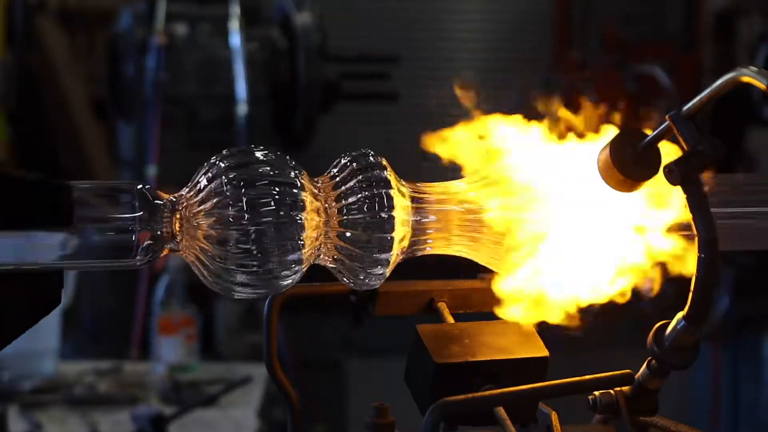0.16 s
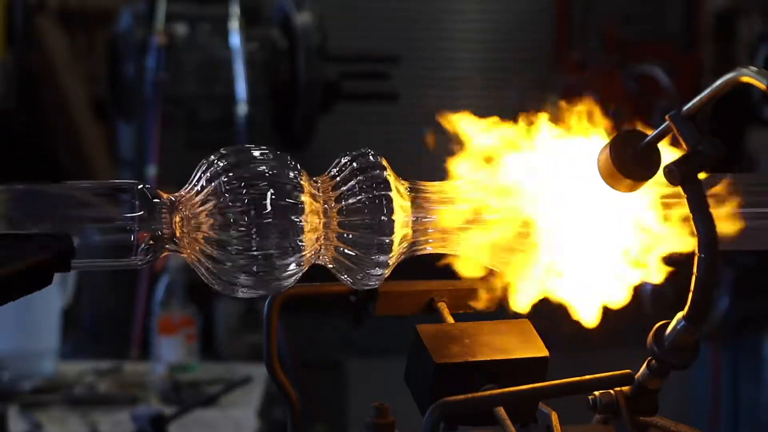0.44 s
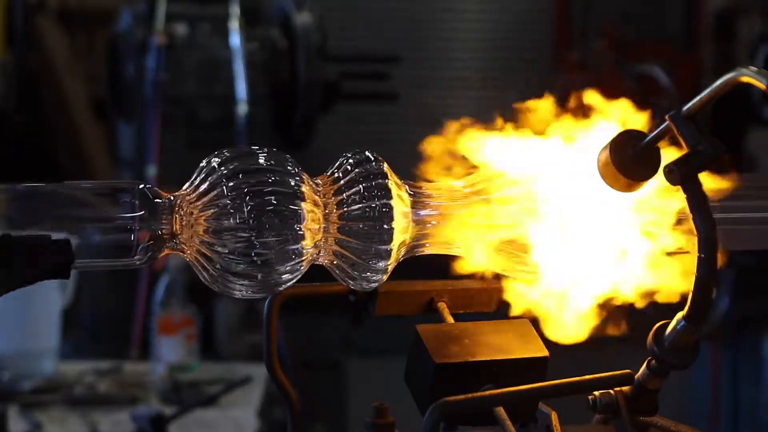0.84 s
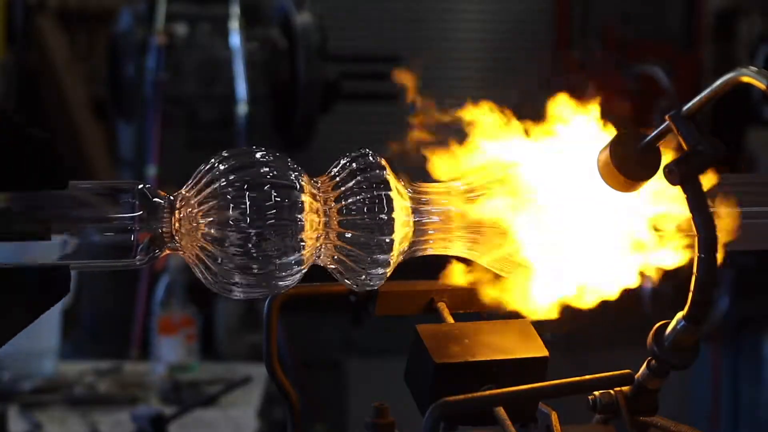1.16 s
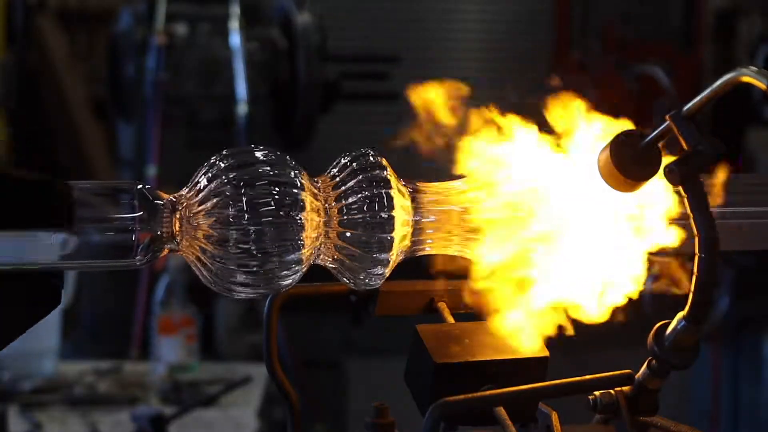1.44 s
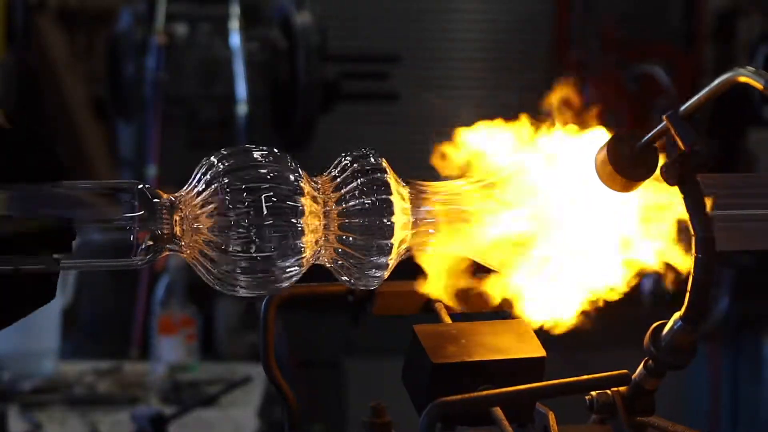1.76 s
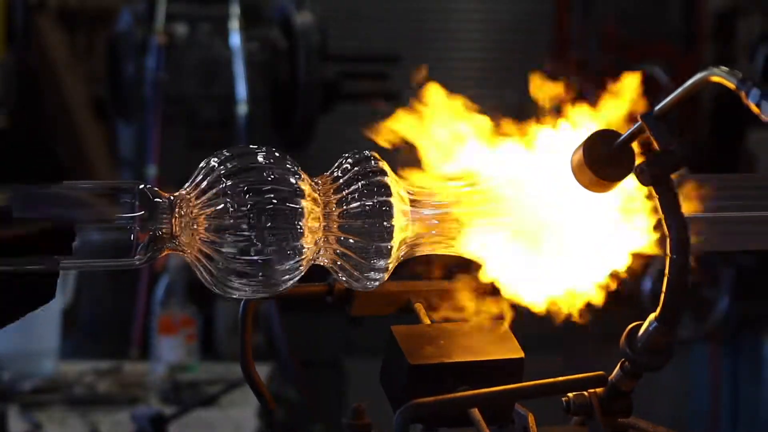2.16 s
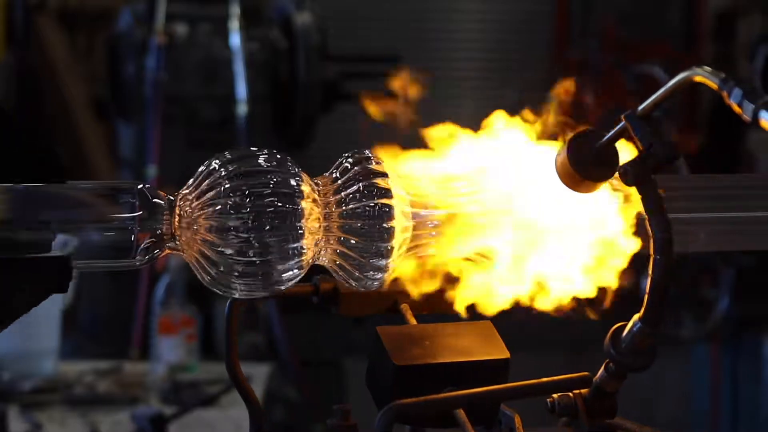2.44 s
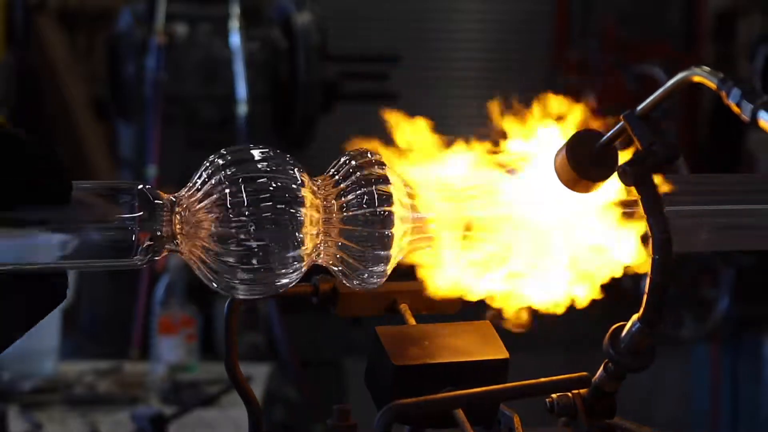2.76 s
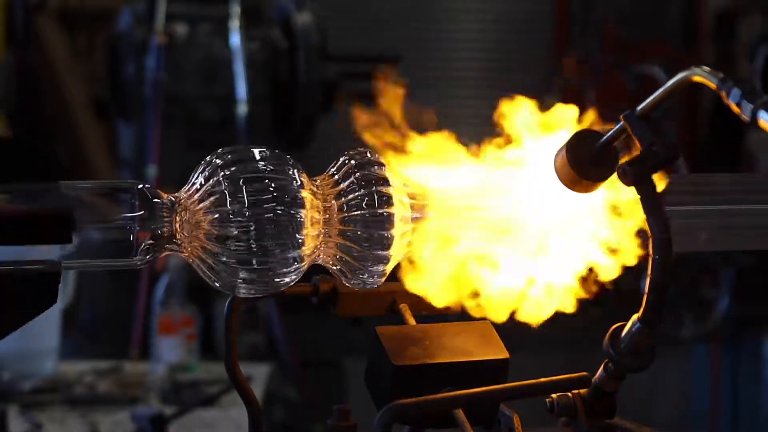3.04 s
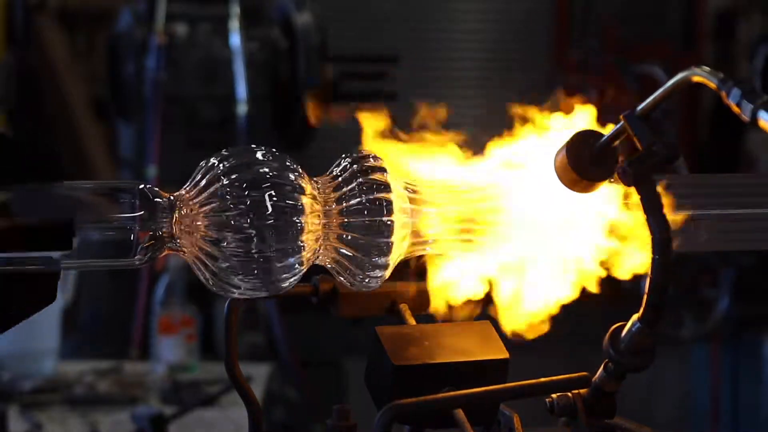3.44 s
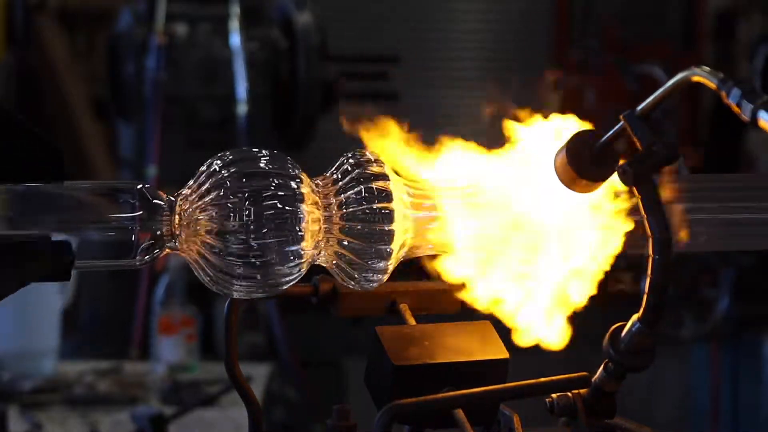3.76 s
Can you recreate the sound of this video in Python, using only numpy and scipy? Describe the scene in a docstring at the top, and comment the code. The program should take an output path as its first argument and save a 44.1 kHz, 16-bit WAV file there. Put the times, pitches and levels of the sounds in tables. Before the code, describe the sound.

Steady roar of a torch flame heating glass, dominated by airy gas hiss above a low turbulent rumble, with a piercing nozzle whine rapidly swelling and fading throughout; mono, small dry workshop.

```python
"""A gas torch plays on glass turning in a lathe, heard by a single microphone in a workshop.
The flame rumbles low: coloured noise whose bands swell apart and flicker together.
The gas jet hisses as brighter noise with broad humps that sink as the torch swings along the glass.
The nozzle whistles a thin sine, wavering in pitch and level, within a narrow band of airy noise.
The walls give flame and jet a fixed grainy colour through a dense, dying tail of echoes."""
import sys
import numpy as np
from scipy import signal
from scipy.fft import rfft, irfft
from scipy.io import wavfile
from scipy.ndimage import uniform_filter1d

SR = 44100
rng = np.random.default_rng(int(sys.argv[2]) if len(sys.argv) > 2 else 0)


def gain_from_db(level_db):
    """Convert decibel levels to linear amplitude factors (20 dB per decade)."""
    decades = np.asarray(level_db, float) / 20
    return 10 ** decades


def materialize(psi):
    """Save the field psi as 16-bit PCM at rate SR to the path in sys.argv[1].

    A 1-D psi becomes a single channel; in a 2-D psi each row is a channel.
    """
    bounded = np.clip(np.atleast_2d(psi).T, -1, 1)
    quanta = np.round(bounded * 32767).astype(np.int16)
    wavfile.write(sys.argv[1], SR, quanta)


N = 171549  # samples, 3.89 s
BIN_HZ = np.arange(N // 2 + 1) * SR / N
TOP_HZ = 15690  # top of the recorded band


def curve(table, col=1):
    """One column of a time table, joined by straight lines."""
    rows = np.array(table)
    return np.interp(np.arange(N) / SR, rows[:, 0], rows[:, col])


def unit(x):
    """Scale to rms 1."""
    return x / np.sqrt(np.mean(x ** 2))


def walk(rate):
    """Smooth chance that changes about rate times a second; spread 1."""
    window = int(SR / rate)
    smooth = uniform_filter1d(rng.standard_normal(N), window)
    return unit(uniform_filter1d(smooth, window))


def noise(gain):
    """Noise of rms 1 with the gain that a function gives to each frequency."""
    hz = np.maximum(BIN_HZ, 1)
    return unit(irfft(rfft(rng.standard_normal(N)) * gain(hz), N))


def coloured(points):
    """Turbulence: noise of (Hz, dB) colour whose half-octave bands swell alone and flicker together."""
    swell_db, swells_per_s = 0.55, 3
    flicker_db, flickers_per_s = 0.5, 13
    hz, db = np.array(points).T
    f = np.maximum(BIN_HZ, 1)
    colour = gain_from_db(np.interp(np.log(f), np.log(hz), db, right=-90))
    spectrum = rfft(rng.standard_normal(N)) * colour
    first = int(2 * np.log2(hz[0]))
    last = int(2 * np.log2(min(hz[-1], TOP_HZ))) + 1
    total = np.zeros(N)
    for k in range(first, last + 1):
        # overlapping triangles, half an octave apart, that add up to 1
        triangle = np.clip(1 - abs(2 * np.log2(f) - k), 0, 1)
        total += irfft(spectrum * triangle, N) * gain_from_db(swell_db * walk(swells_per_s))
    return unit(total) * gain_from_db(flicker_db * walk(flickers_per_s))


def resonance(hz, width_hz):
    """Noise in one resonance with broad, slowly falling skirts; the width is taken at half amplitude."""
    return noise(lambda f: 1 / (1 + (2 * (f - hz) / width_hz) ** 2))


def flame():
    """Low turbulent burning: a steady rumble of coloured noise."""
    # colour of the burning, relative level per Hz: f/Hz, level/dB
    flame_colour = [(15, -58), (25, -33), (102, -9), (130, -5.5), (181, -1.5), (284, -3), (381, 1.5),
                    (672, -5.5), (850, -5), (1010, -2.5), (1440, -7), (1560, -3.5), (1750, -5.5),
                    (2310, -2.5), (2700, -10.5), (3510, -26), (5940, -120)]
    return gain_from_db(-30.5) * coloured(flame_colour)  # dB


def jet():
    """Gas rushing out: turbulent hiss, with resonant humps that rise and sink over it."""
    # colour of the hiss, relative level per Hz: f/Hz, level/dB
    jet_colour = [(2400, -32), (2750, -12.5), (3250, -5), (3520, -9.5), (3950, -4), (4500, -5),
                  (5100, -3.5), (5900, -1.5), (7500, -2.5), (8800, -1), (9300, -4), (10200, -7),
                  (11300, -6.5), (12200, -2.5), (13100, -9), (14100, -6), (15750, -14.5)]
    # course of the hiss ahead of the lift below: t/s, level/dB
    jet_course = [(0.0, -28), (0.01, -26), (0.53, -26.5), (2.99, -27), (3.02, -27), (3.89, -26)]
    # humps of the hiss: f/Hz, width/Hz
    humps = [(5950, 780), (8800, 1140), (12400, 1300)]
    # course of the humps: t/s, low hump level/dB, middle hump level/dB, high hump level/dB
    hump_course = [(0, -35, -36, -40), (.6, -29, -29, -32), (1.4, -31, -30.5, -35), (1.8, -32, -29, -35),
                   (2.3, -31.5, -32, -38), (2.8, -38, -35, -42), (3.89, -35, -38, -41)]
    lift_db = 6.5
    hiss = gain_from_db(curve(jet_course) + lift_db) * coloured(jet_colour)
    for k, (hz, width_hz) in enumerate(humps):
        hiss += gain_from_db(curve(hump_course, col=k + 1)) * resonance(hz, width_hz)
    return hiss


def whistle():
    """A nozzle tone that wavers in pitch and swells, fades and flutters, in a narrow airy band."""
    # course of the tone, rms, ahead of the flutter: t/s, level/dB
    whistle_course = [(0.0, -21), (0.07, -29), (0.17, -13.5), (0.2, -37), (0.25, -18.5), (0.3, -26),
                      (0.33, -15.5), (0.4, -28), (0.44, -14.5), (0.46, -23.5), (0.53, -19.5), (0.55, -37),
                      (0.58, -17), (0.63, -32), (0.8, -20), (0.83, -29), (0.88, -14.5), (0.92, -26),
                      (1.04, -22), (1.07, -33), (1.1, -18), (1.16, -20.5), (1.19, -29), (1.22, -16.5),
                      (1.32, -25.5), (1.39, -15.5), (1.45, -34), (1.49, -18), (1.58, -20), (1.61, -30),
                      (1.7, -22), (1.73, -21), (1.8, -33), (1.84, -24), (2.01, -28), (2.07, -25.5),
                      (2.12, -14), (2.17, -18), (2.2, -25.5), (2.33, -22), (2.38, -14.5), (2.42, -22.5),
                      (2.47, -16), (2.55, -25), (2.57, -38), (2.62, -18), (2.72, -26), (2.75, -21.5),
                      (2.97, -16.5), (3.0, -27), (3.04, -18.5), (3.11, -33), (3.26, -18), (3.3, -19),
                      (3.35, -27), (3.42, -21), (3.75, -20), (3.79, -15.5), (3.82, -23.5), (3.89, -16)]
    tone_hz, waver_hz, wavers_per_s = 10540, 4, 30
    flutter_db, flutters_per_s = 1.2, 90
    air_hz, air_width_hz, air_db = 10522, 38, -31
    pitch_hz = tone_hz + waver_hz * walk(wavers_per_s)
    phase = 2 * np.pi * np.cumsum(pitch_hz) / SR
    level_db = curve(whistle_course) + flutter_db * walk(flutters_per_s)
    tone = np.sqrt(2) * gain_from_db(level_db) * np.sin(phase)  # sqrt(2): a sine of rms 1
    air = noise(lambda f: 1 / np.hypot(1, 2 * (f - air_hz) / air_width_hz))
    return tone + gain_from_db(air_db) * air


def room(x, wet_db):
    """Direct sound plus a dense dying cloud of wall echoes that lack the top."""
    t60_s, first_echo_s, echo_top_hz = 0.21, 0.00415, 9500
    t = np.arange(SR // 2) / SR
    decay = np.exp(-np.log(1000) * t / t60_s)  # 60 dB down after t60_s
    tail = rng.standard_normal(len(t)) * (t > first_echo_s) * decay
    tail = gain_from_db(wet_db) * tail / np.sqrt(np.sum(tail ** 2))
    dull = 1 / np.hypot(1, (BIN_HZ / echo_top_hz) ** 4)
    # circular: the tail of the end runs on at the start
    wet = irfft(rfft(x) * rfft(tail, N) * dull, N)
    return (x + wet) / np.sqrt(1 + gain_from_db(wet_db) ** 2)


def scene():
    """One microphone feeds both channels; the whistle comes direct, without wall echoes."""
    flame_in_room = room(flame(), wet_db=-12.5)
    jet_in_room = room(jet(), wet_db=-8.5)
    mono = flame_in_room + jet_in_room + whistle()
    return np.array([mono, mono])


def top_cut(x):
    """A steep low-pass: nothing passes above about 16.2 kHz."""
    return signal.sosfilt(signal.butter(12, 16180, fs=SR, output="sos"), x)


def record(dry):
    """The recorder cuts the top with a steep elliptic low-pass."""
    # order 8, 0.2 dB ripple, 70 dB stop band
    low_pass = signal.ellip(8, .2, 70, TOP_HZ, fs=SR, output="sos")
    mix = signal.sosfilt(low_pass, dry)
    return top_cut(mix)


dry = scene()
out = record(dry)
materialize(out)
```